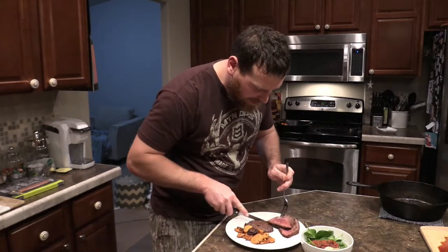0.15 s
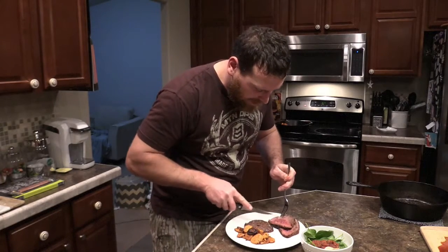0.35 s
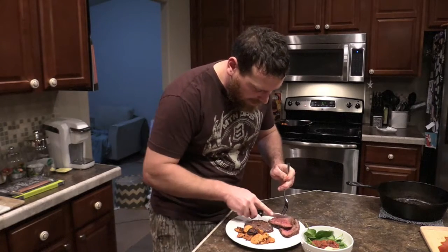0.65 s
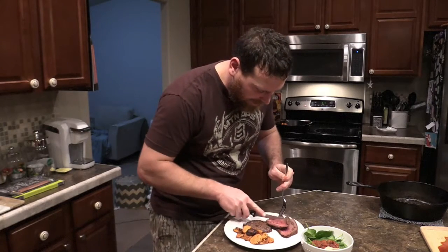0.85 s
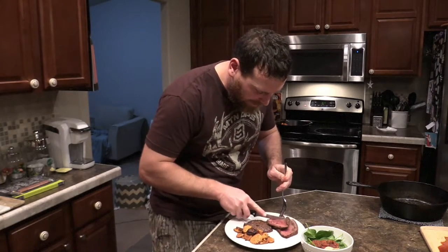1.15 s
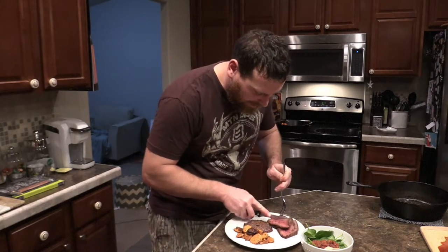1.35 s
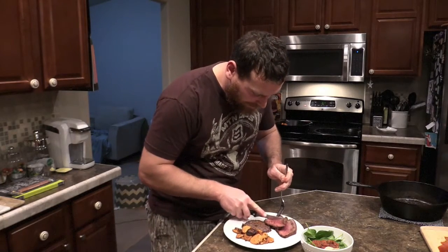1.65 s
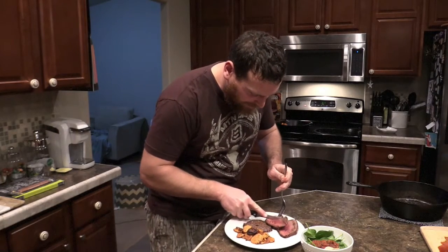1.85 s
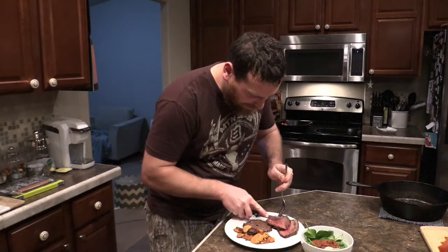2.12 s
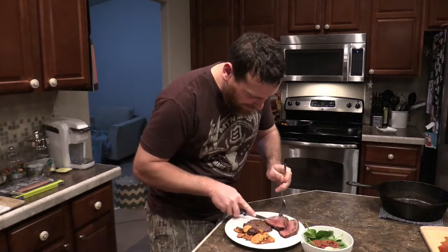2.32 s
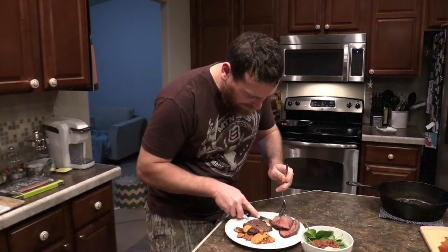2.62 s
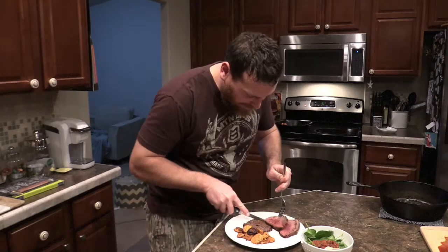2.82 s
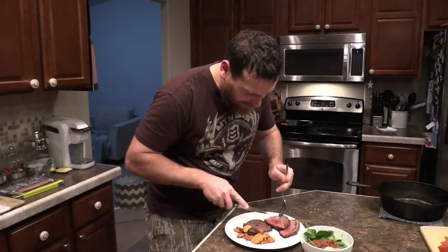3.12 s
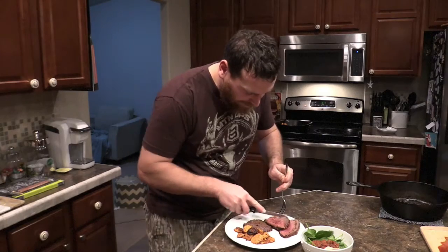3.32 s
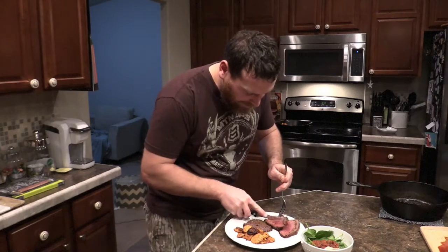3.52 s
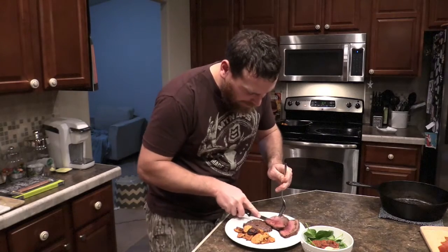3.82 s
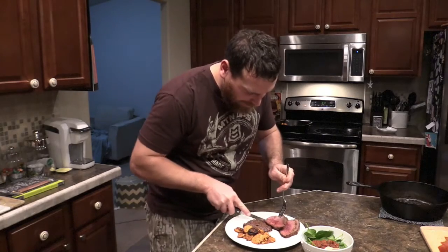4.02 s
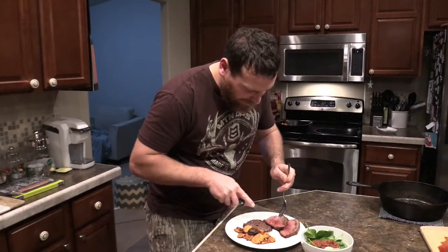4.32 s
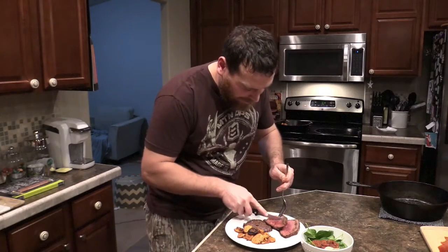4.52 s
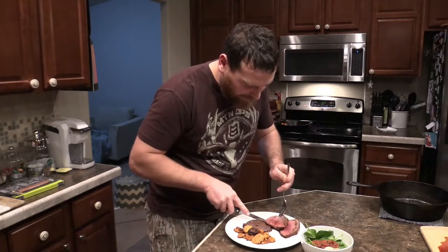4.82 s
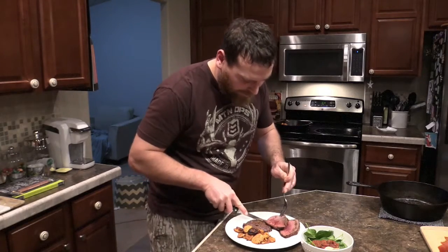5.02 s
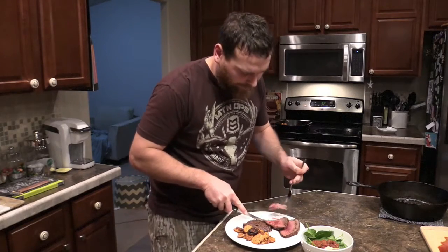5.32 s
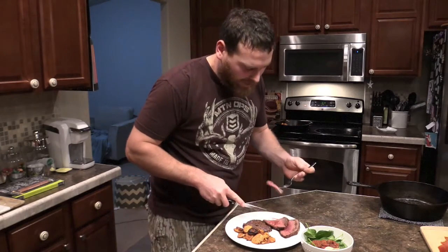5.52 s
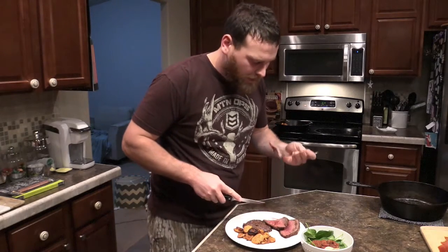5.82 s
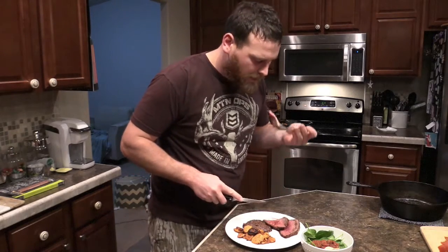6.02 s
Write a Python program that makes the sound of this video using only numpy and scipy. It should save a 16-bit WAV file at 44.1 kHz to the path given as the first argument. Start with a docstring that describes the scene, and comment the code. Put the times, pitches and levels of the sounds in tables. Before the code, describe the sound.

In a small kitchen with a steady low hum and faint hiss, a knife saws quietly through meat on a plate. Soft thuds of the plate rocking on the countertop lead to a quick cluster of bright cutlery clinks. The cutting resumes, steel strikes the ceramic again, and near the end it hits hard and skids with a short squeal before some last gentle taps. Everything is heard directly, with brief reflections off the walls.

```python
"""A steel knife saws meat on a ceramic dinner plate, on the counter of a small, hard kitchen.
Its teeth rasp in tiny slips; knife and fork tick, skid and clink on the glaze, and the plate
knocks on the counter. The microphone hears this direct, then off the walls, over mains hum, air
noise and a deep rumble. The recorder's gain ducks on loud clinks and slowly recovers."""
import sys
import numpy as np
from scipy import signal
from scipy.fft import rfft, irfft
from scipy.io import wavfile
from scipy.ndimage import uniform_filter1d

SR = 44100
rng = np.random.default_rng(int(sys.argv[2]) if len(sys.argv) > 2 else 0)


def pcm_store(signal):
    """Save signal as 16-bit PCM."""
    levels = np.round(np.clip(np.atleast_2d(signal), -1, 1) * 32767)
    wavfile.write(sys.argv[1], SR, levels.astype(np.int16).T)


N = 271597
TIME = np.arange(N) / SR
RING_TIME = TIME[:SR // 3]


# Cuts on the plate, levels before the trim in scene():
# (middle of first stroke [s], strokes [count], stroke length [s], rasp [dB], plate rumble [dB])
KNIFE_CUTS = [(0.125, 1, 0.056, -38, -43), (0.27, 2, 0.19, -50, -41), (0.926, 2, 0.082, -27, -24),
              (1.495, 1, 0.029, -31, -39.5), (1.654, 2, 0.081, -27, -30), (1.98, 1, 0.05, -34.5, -46),
              (2.895, 1, 0.14, -32, -33), (3.87, 1, 0.1, -33, -31.5), (4.064, 1, 0.16, -29.5, -30),
              (4.874, 1, 0.08, -33, -31.5)]
# The rasp at the blade: (frequency [Hz], level [dB per Hz])
BLADE_SPECTRUM = [(150, -14), (1350, -10.5), (1650, 5.5), (2200, -6.5), (2650, 0), (3300, 0), (3900, -5),
                  (4800, -9.5), (5350, -7), (7000, -17), (10000, -21.5), (16000, -41)]
# The plate rumbling under the blade: (frequency [Hz], level [dB per Hz])
PLATE_RUMBLE_SPECTRUM = [(70, -22), (200, -7.5), (400, 4), (600, -3), (850, -2.5), (1100, -16), (2000, -51)]

def sawing(stroke_gap_s=0.1626, blade_hz=1630, blade_q=6, blade_db=-45):
    """The teeth catch and slip, swelling with each stroke, heard in the steel and through the plate."""
    rasp_ease_db, rumble_ease_db = 0.8, 12.5  # lost with each stroke as the meat gives way
    slips = friction()
    rasp, rumble, touch = np.zeros((3, N))
    for s, count, length, rasp_db, rumble_db in KNIFE_CUTS:
        for k in range(round(count)):
            speed = swell(s + k * stroke_gap_s, length)
            rasp += amp(rasp_db - k * rasp_ease_db) * speed
            rumble += amp(rumble_db - k * rumble_ease_db) * speed
            touch += speed
    bending = unit(signal.lfilter(*signal.iirpeak(blade_hz, blade_q, SR), slips))
    blade_tone = amp(blade_db) * touch * bending  # even a light touch wakes this mode
    return rasp * colour(slips, BLADE_SPECTRUM) + rumble * colour(slips, PLATE_RUMBLE_SPECTRUM) + blade_tone


# Steel strikes the plate, the loudest sound at the microphone:
# (time [s], level [dB], fork ring [dB], plate's freedom to ring [dB])
PLATE_STRIKES = [(0.2888, -22, -8, -11), (2.1594, -10, -13, -2), (2.1700, -18, -20, -2),
                 (2.1797, -5.5, -14, -1.5), (2.1926, -3, -6, 9), (2.21, 4.5, -7, 1.5),
                 (2.282, 0.5, -2.5, -2.5), (2.296, 0.5, -12.5, -4), (2.3197, -1, -7.5, -6),
                 (3.6377, -11, -8, -8), (3.6524, 1.5, -15.5, -6.5), (4.6077, 7, 7.5, -2),
                 (4.6883, -1.5, -7, -5), (4.7157, 1.5, -3.5, -4.5)]
# Modes of the plate and of the fork: (frequency [Hz], level [dB], t60 [s])
PLATE_MODES = [(649, -12.5, 0.091), (981, -9.5, 0.1), (2113, -7.5, 0.18), (2518, -9, .06),
               (2810, 0.5, 0.044), (2963, -14, 0.067), (3084, 6, 0.071), (3123, 3, 0.14), (3183, -6, 0.092),
               (3252, -0.5, 0.16), (3473, -4, 0.14), (3554, -8, .11), (3636, -3, 0.077), (4440, 0, 0.036),
               (5390, -10, 0.11), (7620, -13, 0.041), (10600, -39, .06), (12900, -36, .1),
               (14400, -25, 0.047)]
FORK_MODES = [(5030, -21, 0.031), (5376, 10, 0.022), (5770, -10, 0.05), (6420, 1.5, 0.047),
              (7830, 1.5, 0.031), (9380, -1, 0.02), (10200, -18, 0.055), (11100, -1.5, 0.03),
              (11520, -12, 0.037), (14330, -1, 0.035)]
# Hard contact on the glaze, and the counter top beneath: (frequency [Hz], level [dB per Hz])
CONTACT_SPECTRUM = [(200, -22), (900, -5), (1250, -30), (1650, -11.5), (2150, -26), (2500, -7), (3150, 5.5),
                    (3900, -15), (4500, -9), (4950, -13.5), (5400, 0.5), (6600, -25), (7850, -22),
                    (8500, -24), (11100, -25), (12300, -39), (13900, -37), (14450, -30), (15000, -42),
                    (16000, -43)]
COUNTER_SPECTRUM = [(60, -15), (200, -10.5), (430, 5.5), (620, -7.5), (750, -3), (950, -5.5), (2000, -26.5)]

def clinks(rise_s=0.0017):
    """A hard crack of contact, the ring of plate and fork, and a dull push into the counter."""
    out = np.zeros(N)
    rise = np.minimum(RING_TIME / rise_s, 1)
    for s, db, fork_db, freedom_db in PLATE_STRIKES:
        tilt_db = 4 + 0.4 * fork_db  # the more the fork rings, the brighter the clink
        crack = burst(CONTACT_SPECTRUM, t60=0.0083, tilt_db=tilt_db, contact_s=0.0029)
        tones = amp(freedom_db + 2) * ring(PLATE_MODES, tilt_db) + amp(fork_db) * ring(FORK_MODES)
        push_db = -17.5 - 0.99 * freedom_db  # a plate held down passes more of the blow to the counter
        push = amp(push_db) * burst(COUNTER_SPECTRUM, t60=0.062, shift=1.08)
        add(out, s, amp(db) * rise * (unit_attack(crack + amp(-3) * tones) + push))
    return out


# Skids on the bare glaze, before the trim in scene(): (start [s], end [s], scrape [dB], squeal [dB])
GLAZE_SKIDS = [(2.12, 2.17, -20.5, -48), (3.617, 3.65, -26, -49), (4.623, 4.645, -1, -5.5)]

def skids(squeal_hz=3170, jitter=0.0272, edge_s=0.0042):
    """Steel grates over the glaze; pressed hard, its slips lock to the plate's main mode and squeal."""
    scrape = colour(friction(), CONTACT_SPECTRUM)
    wander = unit(uniform_filter1d(rng.standard_normal(N), size=80))
    pitch_hz = squeal_hz * (1 + jitter * wander)
    squeal = np.sqrt(2) * np.sin(2 * np.pi * np.cumsum(pitch_hz) / SR)
    out = np.zeros(N)
    for start, end, scrape_db, squeal_db in GLAZE_SKIDS:
        pressed = np.clip(np.minimum(TIME - start, end - TIME) / edge_s, 0, 1)
        out += pressed * (amp(scrape_db) * scrape + amp(squeal_db) * squeal)
    return out


# Knife and fork touch at the plate: (time [s], level [dB], brightness [dB per octave])
CUTLERY_TICKS = [(2.0232, -34, 4), (2.8987, -23, 0), (3.9697, -18.5, -1.5), (4.0312, -25, 7.5),
                 (4.7750, -15, 2.5), (5.352, -23.5, 2.5), (5.3806, -31.5, 3), (5.4222, -32.5, -3)]
# Modes of the knife blade: (frequency [Hz], level [dB], t60 [s])
KNIFE_MODES = [(1740, 4, 0.015), (3150, -6, 0.11), (3370, -2, 0.09), (5360, 0.5, 0.039)]

def ticks(ring_db=0.5, push_db=-4.5):
    """Light touches snap, ring the blade and push softly into the counter."""
    out = np.zeros(N)
    for s, db, tilt_db in CUTLERY_TICKS:
        snap = burst(BLADE_SPECTRUM, t60=0.043, tilt_db=tilt_db, contact_s=0.004)
        blade = amp(ring_db) * ring(KNIFE_MODES)
        push = amp(push_db) * burst(COUNTER_SPECTRUM, t60=0.038)
        add(out, s, amp(db) * (snap + blade + push))
    return out


# The plate rocks on the counter, before the trim in scene(): (time [s], level [dB])
PLATE_KNOCKS = [(1.1905, -17), (1.5420, -11.5), (1.9370, -18.5), (2.951, -25.5), (3.7650, -18.5),
                (4.089, -22.5)]
# Modes of the loaded plate on the counter top: (frequency [Hz], level [dB], t60 [s])
THUD_MODES = [(99, -19, 0.089), (132, -1, 0.046), (344, 4, 0.049), (453, -0.5, 0.018), (530, -0.5, 0.017)]

def knocks(bounces=4, bounce_s=0.011, loss_db=11, dulling_db=3):
    """The plate's foot lands and chatters to rest, each bounce softer and duller."""
    out = np.zeros(N)
    for s, db in PLATE_KNOCKS:
        for k in range(bounces):
            thud = unit_attack(ring(THUD_MODES, -k * dulling_db, scatter=0))
            add(out, s + k * bounce_s, amp(db - k * loss_db) * thud)
    soft_landing = signal.butter(4, [55, 720], "bandpass", fs=SR, output="sos")
    return signal.sosfilt(soft_landing, out)


# Counter and walls, heard just after the direct sound: (delay [s], level [dB])
NEAR_REFLECTIONS = [(.0016, -23.5), (.0075, -16), (0.011, -13.5), (0.0207, -11), (.0255, -27.5),
                    (.031, -27)]
# The kitchen's decay: (frequency [Hz], t60 [s])
TAIL_DECAY = [(100, 0.86), (300, 0.27), (700, 0.58), (3000, 0.45), (6000, 0.4), (10000, 0.37), (16000, 0.2)]
# Its tail against the direct sound at the microphone: (frequency [Hz], level [dB])
TAIL_LEVEL = [(100, 2), (600, 1), (3000, -2.5), (6000, -6.5), (9000, -3), (14000, -8)]

def kitchen(x, onset_s=0.0034, build_s=0.0076, frame=256):
    """Direct sound, a few near reflections, and a dense tail whose top treble dies first."""
    taps = rng.standard_normal(SR) * (rng.random(SR) < .15)
    hz, t, bands = signal.stft(unit(taps), SR, nperseg=frame)
    t60 = read(TAIL_DECAY, hz)[:, None]
    decay = np.exp(-np.log(1000) * t / t60) * np.sqrt(2 * np.log(1000) / t60 / SR)  # unit energy
    bands = bands * decay * amp(read(TAIL_LEVEL, hz))[:, None]
    build = np.clip((TIME[:SR] - onset_s) / build_s, 0, 1)
    response = signal.istft(bands, SR, nperseg=frame)[1][:SR] * build
    response[0] += 1  # direct path
    for s, db in NEAR_REFLECTIONS:
        add(response, s, amp([db]))
    return signal.fftconvolve(x, response)[:N]


# Mains hum in the room: (frequency [Hz], level [dB])
HUM_PARTIALS = [(59.4, -37.5), (119.6, -40), (179, -61.5)]

def mains_hum(waver=0.16):
    """Appliances hum, each partial wavering slowly in level and phase."""
    def drift():
        return waver * noise([(3, 0), (12, -40), (40, -120)])
    return sum(amp(db) * unit((1 + drift()) * np.sin(2 * np.pi * hz * TIME + drift()))
               for hz, db in HUM_PARTIALS)


# Swells of the rumble behind the cutting: (middle [s], length [s], rise [dB])
RUMBLE_SWELLS = [(0.317, 1, 11.5), (2.012, 0.4, 7.5)]

def deep_rumble(steady_db=-42.5):
    """A deep, uneven rumble that swells twice."""
    rumble = noise([(8, -1.5), (16, -19), (24, 4), (32, -13), (55, -4.5), (200, -50), (1000, -100)])
    rise_db = sum(db * swell(s, length) for s, length, db in RUMBLE_SWELLS)
    return amp(steady_db + rise_db) * rumble


# Room tone at the microphone: (frequency [Hz], level [dB per Hz])
AIR_SPECTRUM = [(20, -2.5), (50, -6.5), (85, -9), (150, -1), (280, -1), (460, -6.5), (600, -11),
                (1000, -15.5), (2000, -17.5), (6000, -21), (12000, -25.5), (16000, -30)]

def air(level_db=-34):
    """Steady air noise, strongest in the bass."""
    return amp(level_db) * noise(AIR_SPECTRUM)


def friction(slips_per_s=1600, spread_db=3, smooth=0.38):
    """A dense train of tiny slips of uneven size over a smooth rub."""
    size = amp(spread_db * np.minimum(rng.exponential(1, N), 3))
    slips = (rng.random(N) < slips_per_s / SR) * rng.choice([-1, 1], N) * size
    return unit(slips) + smooth * rng.standard_normal(N)


def ring(modes, tilt_db=0, spread_db=3.5, scatter=1):
    """Each point of contact weights a body's modes differently; chatter scatters their phases."""
    hz, db, t60 = np.transpose(modes)
    weight = amp(db + tilt_db * np.log2(hz / hz[0]) + spread_db * rng.standard_normal(len(hz)))
    phase = 2 * np.pi * scatter * rng.random(len(hz))
    tones = sum(w * dying(d) * np.sin(2 * np.pi * f * RING_TIME + p)
                for f, w, d, p in zip(hz, weight, t60, phase))
    return tones / np.sqrt(np.sum(weight ** 2) / 2)


def burst(spectrum, t60, tilt_db=0, shift=1, contact_s=0):
    """Many heavily damped modes, driven while the contact chatters and dying after it."""
    chatter = colour(rng.standard_normal(len(RING_TIME)), spectrum, tilt_db, shift)
    return unit_attack(chatter * dying(t60, contact_s))


def dying(t60, hold_s=0):
    """Holds, then loses 60 dB in t60 seconds."""
    return np.exp(-np.log(1000) * np.maximum(RING_TIME - hold_s, 0) / t60)


def swell(middle_s, length_s):
    """A smooth rise and fall from 0 to 1 and back."""
    return np.exp(-(2 * (TIME - middle_s) / length_s) ** 2)


def noise(spectrum):
    """Steady noise with a spectrum, at rms 1."""
    return colour(rng.standard_normal(N), spectrum)


def colour(x, spectrum, tilt_db=0, shift=1):
    """Gives x a spectrum, shifted by a pitch factor and tilted in dB per octave above 1 kHz, at rms 1."""
    hz = np.fft.rfftfreq(len(x), 1 / SR)
    octaves = np.log2(np.maximum(hz, 1000) / 1000)
    gain = amp(read(spectrum, hz / shift) + tilt_db * octaves)
    return unit(irfft(rfft(x) * gain, len(x)))


def read(points, hz):
    """Joins (Hz, value) points on a log-frequency axis."""
    f, value = np.transpose(points)
    return np.interp(np.log(hz + 1), np.log(f), value)


def add(mix, s, sound):
    """Mixes a sound in at time s."""
    part = mix[max(round(s * SR), 0):][:len(sound)]
    part += sound[:len(part)]


def amp(db):
    """Decibels to gain."""
    return 10 ** (np.asarray(db) / 20)


def unit(x):
    """Scales to rms 1."""
    return x / np.sqrt(np.mean(x ** 2) + 1e-20)


def unit_attack(x, size=180):
    """Scales a blow so that its first milliseconds have rms 1."""
    return x / np.sqrt(np.mean(x[:size] ** 2) + 1e-20)


def scene():
    """The plate in the kitchen from one microphone position, alike in both channels."""
    at_plate = clinks() + ticks() + amp(0.5) * knocks() + amp(-5) * (sawing() + skids())
    mono = kitchen(at_plate) + mains_hum() + deep_rumble() + air()
    return np.array([mono, mono])


def record(dry, threshold_db=-8, recovery_db_per_s=2, window=300, knee=4, edge_hz=16000):
    """Gain control drops at once on a loud clink and creeps back; then soft overload and a band limit."""
    power = uniform_filter1d((dry ** 2).mean(0), window)
    power_db = 10 * np.log10(abs(power) + 1e-12)
    creep_db = recovery_db_per_s * TIME
    peak_db = np.maximum.accumulate(power_db + creep_db) - creep_db
    duck_db = np.maximum(peak_db - threshold_db, 0)
    held = dry / amp(uniform_filter1d(duck_db, window))
    rounded = held / (1 + abs(held) ** knee) ** (1 / knee)
    low_pass = signal.firwin(255, edge_hz, window=("kaiser", 9), fs=SR)
    return signal.oaconvolve(rounded, low_pass[None], "same")


dry = scene()
out = record(dry)
pcm_store(out)
```